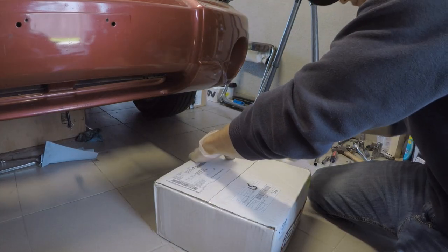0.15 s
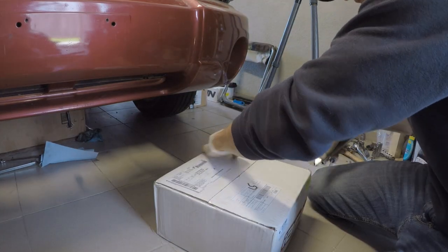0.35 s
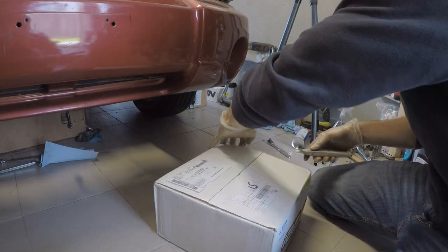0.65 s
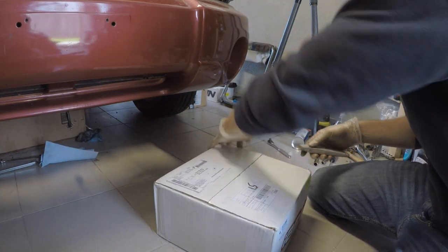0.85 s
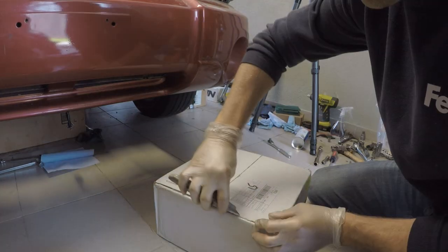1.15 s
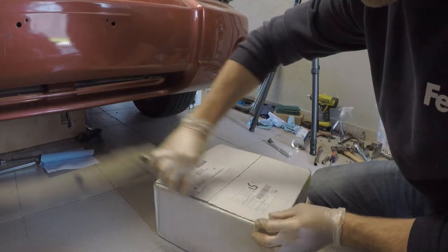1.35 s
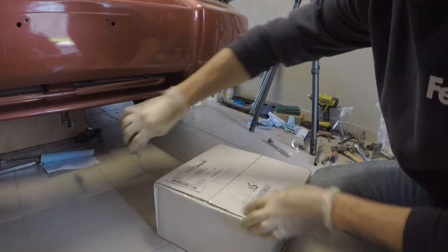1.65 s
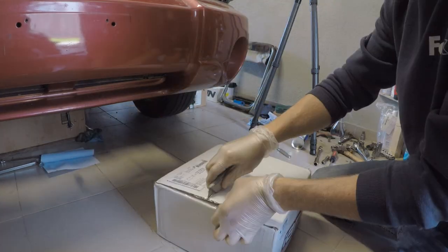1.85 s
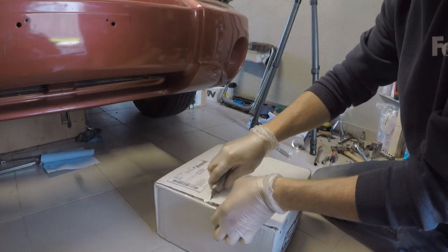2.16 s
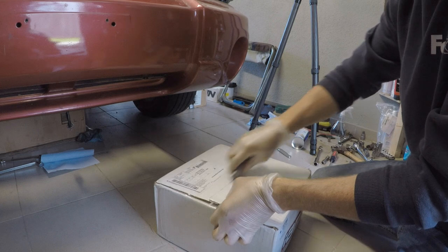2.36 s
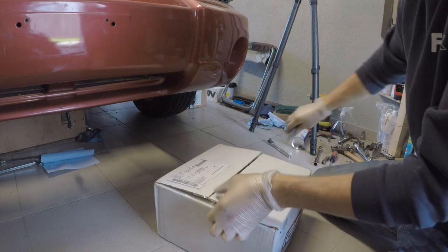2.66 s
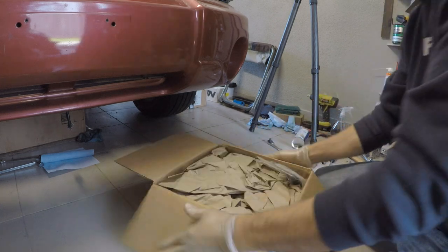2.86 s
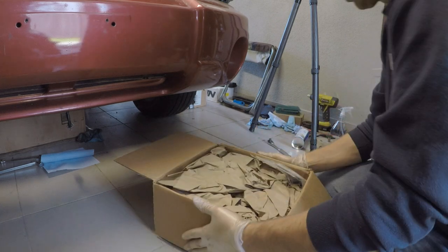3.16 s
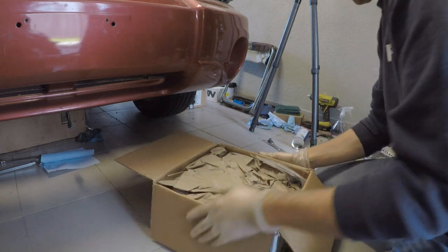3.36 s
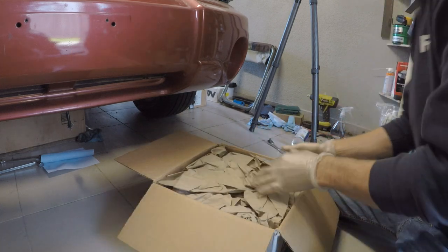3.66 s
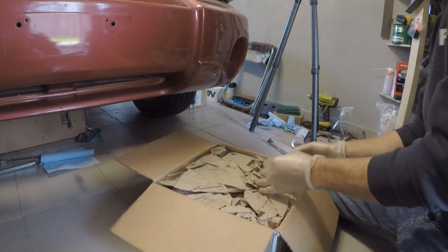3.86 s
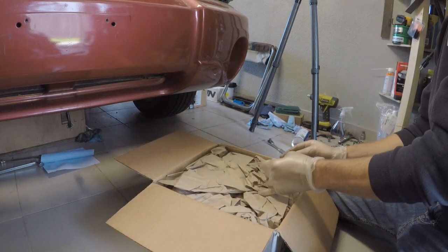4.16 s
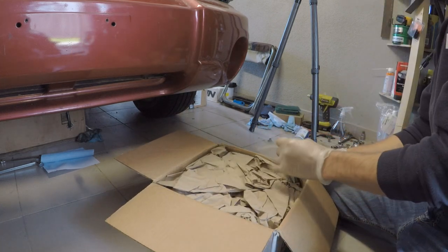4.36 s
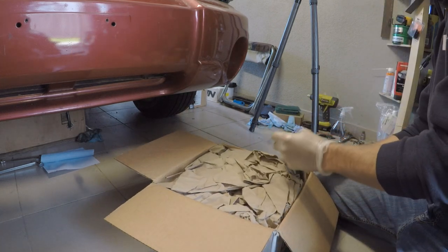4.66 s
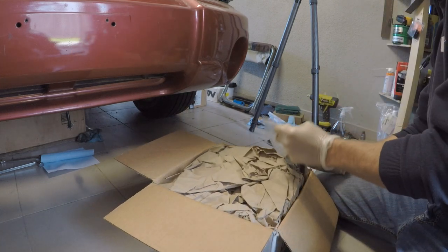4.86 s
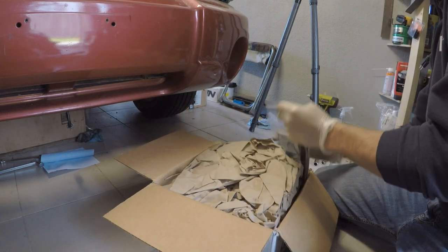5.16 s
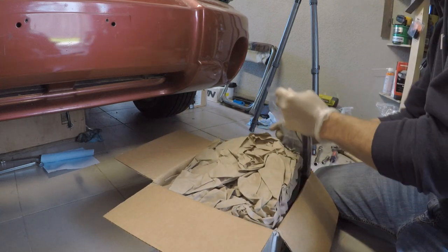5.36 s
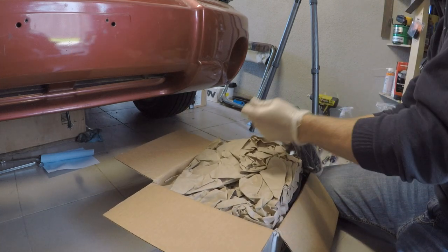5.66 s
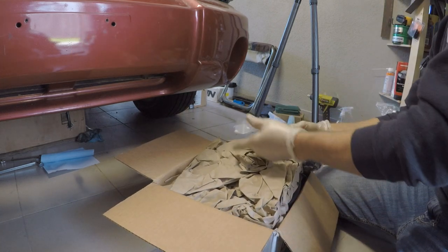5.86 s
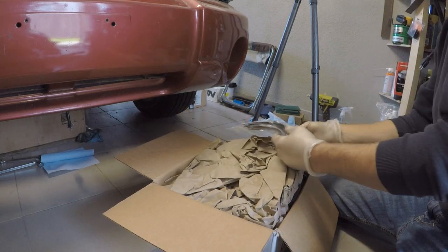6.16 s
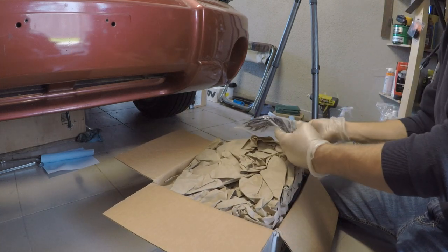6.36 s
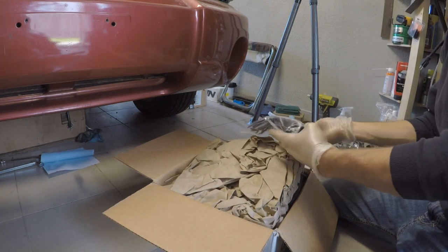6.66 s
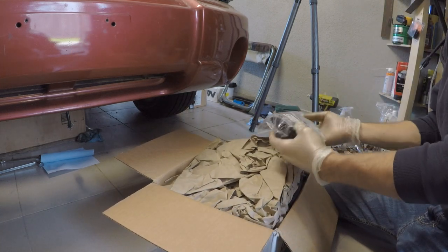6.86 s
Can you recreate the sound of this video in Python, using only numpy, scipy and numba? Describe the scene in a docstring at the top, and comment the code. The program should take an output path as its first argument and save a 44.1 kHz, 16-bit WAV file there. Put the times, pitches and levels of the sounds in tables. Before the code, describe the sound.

A cardboard box is slit open with a blade, then packing paper and a plastic bag are rustled by hand over low traffic rumble.

```python
"""A blade hisses and squeaks through a cardboard box, over traffic rumbling outside an open garage.
Gloved hands fold the flaps, drag the box over concrete and rummage in packing paper and a plastic bag.
Rubbed sheets scuff, creases buckle and snap; the hollow box booms when rubbed or knocked and groans
as a flap sticks and slips. An engine murmurs and drones for a while. Rustle and snaps echo briefly."""
import sys
import numpy as np
from scipy import signal
from scipy.fft import rfft, irfft, next_fast_len
from scipy.io import wavfile
from scipy.ndimage import uniform_filter1d
from numba import njit

SR = 44100
rng = np.random.default_rng(int(sys.argv[2]) if len(sys.argv) > 2 else 0)


def write(x):
    x = np.atleast_2d(x).T
    wavfile.write(sys.argv[1], SR, np.round(np.clip(x, -1, 1) * 32767).astype(np.int16))


N = 308788

# blade and hand strokes: t/s, length/s, start treble/dB, end treble/dB, middle re treble/dB, top boom/dB
HAND_STROKES = [(0.0, 0.14, -27.5, -31, 1.5, -24), (0.174, 0.082, -26.5, -26, 2, -28.5),
                (0.42, 0.68, -64, -60.5, 17, -45), (0.565, 0.11, -56, -43.5, 0, -58),
                (0.84, 0.047, -56, -50, 0, -58), (1.23, 0.1, -42, -28, 1.5, -32),
                (1.401, 0.1, -24.5, -33.5, 0, -18.5), (2.232, 0.071, -39, -46, 6, -23.5),
                (2.322, 0.11, -39.5, -33.5, 9, -27), (2.486, 0.087, -28, -24.5, 5.5, -15),
                (2.817, 0.048, -42, -34.5, 6.5, -38), (2.862, 0.079, -42, -36.5, -16, -40),
                (2.987, 0.086, -28, -44, 10.5, -18), (3.251, 0.087, -41, -38, 1, -40.5),
                (3.383, 0.22, -35, -44, -9, -43), (3.678, 0.033, -37.5, -32.5, 0, -32.5),
                (3.749, 0.12, -42, -45, 4, -37), (3.94, 0.078, -48, -59, 5, -38),
                (4.006, 0.025, -37.5, -47.5, 9.5, -37), (4.1, 0.047, -46, -39, 5.5, -33),
                (4.22, 0.056, -56, -57.5, 14, -44.5), (4.254, 0.045, -38, -42, 3, -41),
                (4.318, 0.089, -49, -56.5, 8, -46), (5.663, 0.2, -47.5, -42, 3.5, -68),
                (5.918, 0.19, -41, -38.5, 0.5, -54), (6.162, 0.22, -51, -52, 4.5, -69),
                (6.433, 0.083, -51.5, -51, 6.5, -62), (6.554, 0.038, -49, -36.5, 3, -33),
                (6.642, 0.11, -45.5, -58, 1, -51), (6.736, 0.024, -55, -63, 7, -45),
                (6.784, 0.048, -36, -37.5, 0.5, -65), (6.906, 0.04, -36, -49, 2, -57),
                (6.978, 0.012, -33, -33.5, -0.5, -33.5)]
# tugs at the paper: t/s, treble/dB, width/s, middle re treble/dB, boom/dB
PAPER_TUGS = [(4.495, -38, 0.087, 7.5, -26.5), (4.612, -41.5, 0.087, 7.5, -27),
              (4.736, -41.5, 0.097, 8, -30), (4.852, -41, 0.077, 9, -27), (4.978, -41, 0.12, 9.5, -28),
              (5.093, -35, 0.066, 9, -27), (5.15, -54.5, 0.13, 6, -29.5), (5.212, -34, 0.08, 6, -25),
              (5.309, -36, 0.059, 9, -29.5), (5.352, -42, 0.078, 1, -55), (5.438, -37, 0.1, 8.5, -46),
              (5.5, -41, 0.12, -3, -32), (5.604, -40.5, 0.069, 6, -42)]
# even hiss of blade and drag to crackle of sheets: t/s, crispness/0-1, film crinkle re treble/dB
TEXTURE = [(0, 0.05, -24), (2.7, 0.27, -32), (3.4, 0.03, -13), (4.3, 0.85, -8), (4.45, 0.4, -11),
           (5.55, 0.34, -6), (5.7, 0.56, -9.5), (7, 0.42, -11)]
CREASE_SPECTRUM = [(1180, -35), (2000, -11.5), (2610, -17.5), (2940, -9.5), (4510, -11.5), (4940, -11.5),
                   (6620, -4), (9730, -16), (11400, -29), (12500, -25.5), (14800, -50)]  # buckling paper: f/Hz, level/dB
FILM_SPECTRUM = [(500, -32), (1200, -3), (3500, -0.5), (6500, -1), (9500, -15), (14000, -18)]  # thin plastic: f/Hz, level/dB
SCUFF_SPECTRUM = [(250, 30.5), (450, 15), (900, 21), (1600, 12), (2500, 11.5), (4000, -33)]  # rubbed sheets: f/Hz, level/dB
# blade or flap edge catching: t/s, length/s, start f/Hz, end f/Hz, start level/dB, end level/dB
EDGE_SQUEAKS = [(.062, 0.031, 2020, 2000, -38, -37), (.155, 0.085, 1795, 1770, -39, -43),
                (.172, 0.021, 4560, 4600, -25.5, -34), (.182, .025, 3670, 3700, -45, -42),
                (.21, 0.044, 6400, 6700, -38, -35), (1.42, 0.04, 3000, 3010, -34, -42),
                (2.335, 0.06, 1424, 1487, -35, -34), (2.51, 0.026, 3640, 3450, -35, -38),
                (2.52, 0.046, 874, 935, -27, -32), (2.54, .035, 4070, 4400, -37, -32),
                (2.555, 0.041, 5930, 6100, -24, -36), (2.68, 0.014, 2900, 2800, -43, -60),
                (3.537, 0.023, 476, 418, -32.5, -29), (3.992, 0.0098, 3680, 3800, -36, -40),
                (1.303, .02, 5000, 5000, -31, -39), (1.4, .04, 6700, 6700, -49, -40),
                (.03, 0.033, 6870, 6950, -40, -33)]
HELD_BOOM = [(0.0, -50), (0.45, -23.5), (1.0, -24), (1.85, -28), (1.95, -31.5), (2.18, -38.5), (2.7, -29),
             (3.2, -31), (3.9, -40.5), (4.42, -34), (4.75, -36), (5.4, -33.5), (5.7, -39), (7.0, -52.5)]  # hum of the held box: t/s, level/dB

TRAFFIC_RUMBLE = [(0.0, -18), (0.16, -16.5), (0.45, -20), (1.02, -19), (1.08, -32), (1.27, -16),
                  (1.45, -31), (1.88, -25), (2.0, -34), (2.6, -31), (3.2, -26), (3.8, -20), (4.5, -24.5),
                  (5.0, -18.5), (5.2, -24.5), (7.0, -34.5)]  # deep rumble: t/s, level/dB
ROAR_AND_AIR = [(0.0, -33, -32), (0.4, -33, -51), (1.02, -28.5, -59), (1.06, -30.5, -51), (1.89, -39, -51),
                (1.91, -42.5, -55), (2.8, -40, -57.5), (7.0, -66, -58)]  # street noise: t/s, tyre level/dB, air level/dB
RUMBLE_SPECTRUM = [(12, -24), (22, 23.5), (45, 22.5), (100, 12), (200, -7), (400, -73)]  # traffic: f/Hz, level/dB
TYRE_SPECTRUM = [(100, 21), (200, 10), (400, -13), (900, -2), (1800, -19), (3500, -56)]  # tyres on the road: f/Hz, level/dB
AIR_SPECTRUM = [(500, -15), (1500, -0.5), (3500, -10), (6500, -2.5), (9000, -7), (14000, -30.5)]  # street air: f/Hz, level/dB
MURMUR_LEVEL = [(0.0, -14.5), (0.6, -20), (1.03, -19.5), (2.3, -35), (2.52, -18.5), (2.73, -29.5), (3.0, -69),
                (3.15, -35.5), (3.76, -21.5), (4.1, -29), (5.1, -23.5), (5.7, -34), (7.0, -34.5)]  # low murmur: idling engine, with the rubbed box's deep hum swelling around 2.5 s: t/s, level/dB

# single creases: t/s, level/dB, f/Hz, bright band gain/dB, shiver re crack/dB
CREASE_SNAPS = [(0.5192, -21, 3470, 6, -10), (0.5417, -22.5, 3780, 3, -3), (0.8415, -33, 3800, 8, -16),
                (0.877, -21, 3780, 15, -9), (1.0754, -18.5, 1950, 6, 4), (1.083, -12, 3650, 2, -11),
                (1.1683, -22, 3480, -2, -8), (1.271, -17.5, 3800, -4, 8), (1.287, -9, 3700, 4, -8),
                (1.306, -9, 1250, -17, 5), (1.5168, -15, 3940, -10, -9), (1.5332, -18.5, 1090, 11, -7),
                (1.6123, -24, 2420, 8, -6), (1.7628, -21.5, 3950, 1.5, 1), (2.1658, -25, 1030, 7, -1),
                (2.2061, -10.5, 1570, -1, -6), (2.68, -20, 2850, -28, -5), (2.9372, 0.5, 1800, -19, -26),
                (2.9376, -11, 2540, -6, -29), (2.9782, -11, 1500, -3, -10), (2.9825, -19, 1700, -5, -16),
                (3.7066, -8.5, 3350, -31, -11), (3.8045, -29, 3000, 0, -9), (3.94, -20, 1500, 9, -7),
                (3.9928, -20, 1200, 3, -7), (3.9956, -22, 3680, 0, -11), (4.093, -27, 1430, -15, -7),
                (4.139, -10, 1390, -1, -10), (4.2298, -28, 1360, -10, -9), (4.248, -17.5, 1480, -5, -9),
                (4.2594, -24, 1560, 0, -11), (4.2792, -17, 1060, 7, -7), (4.4634, -25, 1990, -7, -6),
                (4.689, -35, 3000, -3, -9), (4.837, -28, 2460, -4, -8), (4.955, -18.5, 2000, -11, -2),
                (5.0755, -25, 2520, -5, -8), (5.16, -29, 2500, -2, -9), (5.567, -15, 4520, 9, -17),
                (5.5957, -20, 2050, -6, -4), (5.7612, -19, 3030, 11, -16), (5.8288, -13.5, 6300, 9, -2.5),
                (5.841, -22, 1520, 4, -11), (5.9213, -24.5, 3670, -2, -7), (5.998, -33, 3660, -6, -17),
                (6.03, -24.5, 3400, -8, -6), (6.057, -27, 3200, -6, -12), (6.0727, -20, 2010, -17, -4),
                (6.1497, -19, 1810, -5, -2), (6.1496, -18, 3900, -2, -11), (6.2386, -26, 3820, 7, -11),
                (6.285, -27, 1410, 7, -11), (6.3028, -13, 2300, 7, -12.5), (6.3294, -31, 1240, -5, -11),
                (6.3834, -22.5, 1450, 5, -4), (6.4243, -23, 5570, 4, 0), (6.5324, -34, 1080, -5, -11),
                (6.54, -26, 3250, -11, -9), (6.5676, -25, 3200, -3, 5), (6.5864, -25, 1090, -6, -4),
                (6.6385, -26.5, 4260, -1, -9), (6.684, -25, 1440, -16, -2), (6.7117, -16, 1960, 6, -12),
                (6.779, -20, 2130, 4, -12), (6.7998, -17.5, 3090, 17, 3), (6.8244, -17, 1420, -1, -2),
                (6.8746, -21, 2000, 14, -1), (6.8963, -31, 3270, 0, -11), (6.9646, -15.5, 3810, 10, -5),
                (6.9904, -15, 1910, -7, -11)]
BOX_KNOCKS = [(0.622, -10, -33, 102), (1.309, -13, 1, 322), (1.444, -7.5, -10.5, 108),
              (2.927, -14, -30, 158), (2.9394, 2, -7, 200), (2.981, -3, -1, 132), (3.261, -20.5, -3, 191),
              (3.529, -23.5, -10, 242), (3.991, -29, -28, 130), (4.503, -14.5, -19, 222),
              (4.622, -8.5, -22, 188), (5.09, -14, -14, 197), (5.306, -20, -3, 597),
              (5.45, -7.5, -6.5, 121), (5.949, -24.5, -16, 110), (6.593, -38, 10.5, 102)]  # blows on the box: t/s, ring level/dB, slap re ring/dB, favoured f/Hz
BOX_MODES = [(126, 3.5, 0.14), (161, 7.5, 0.073), (215, -5, 0.1), (234, 8, 0.034), (318, 0.5, 0.15),
             (422.5, -5.5, 0.19), (674, 17, 0.0096), (1354, 0, 0.041), (1890, 10, 0.04), (2500, 4, 0.028)]  # wall modes: f/Hz, level/dB, t60/s
DRY_TICKS = [(1.033, -14.5), (2.803, -14)]  # ticks: t/s, level/dB
# held engine notes: t/s, length/s, start f/Hz, end f/Hz, start level/dB, end level/dB
ENGINE_NOTES = [(1.036, .85, 61.32, 60.24, -17, -19.5), (1.91, 0.41, 64.8, 61.5, -30, -30)]
ENGINE_HARMONICS = [(1, 5), (2, -11), (3, -22), (4, -51)]  # drone partials: multiple, gain/dB
# flap stick-slip: t/s, length/s, start f/Hz, end f/Hz, start level/dB, end level/dB
FLAP_GROANS = [(2.22, 0.068, 114, 115, -20, -10), (2.39, 0.1, 113.3, 154.6, -15.5, -13),
               (2.525, 0.053, 134.8, 140, -19, -10)]
GROAN_HARMONICS = [(1, 0.5), (2, -18), (3, -21)]  # groan partials: multiple, gain/dB

PORT_LIKENESS = [(60, 0.76), (130, 0.8), (290, 0.76), (630, 0.72), (1370, 0.76), (3000, 0.75), (6560, 0.4),
                 (14300, .4)]  # between the microphone ports: f/Hz, coherence/0-1
PORT_LEAD = [(20, 0), (340, 0), (780, 1.25), (1460, 1.15), (2100, .5), (3100, .1), (6000, .8), (9000, 4.0),
             (14000, 6.5)]  # left ahead of right: f/Hz, phase/rad
PORT_TILT = [(25, 8), (60, -2.2), (110, -1.5), (200, -2), (370, -3), (680, -4), (1260, 0.0), (2310, 1.5),
             (4250, -2.5), (7800, -2), (14300, 1)]  # left re right: f/Hz, level/dB

ATTACK_DB_PER_S, RELEASE_DB_PER_S = 395, 373
RASP_HZ, RASP_DB_PER_OCTAVE = 1560, 58
LOUDEST_CREASE_SPREADS, SQUEAK_STEADY_GAIN = 2.2, .35
REST_HZ, PRESSED_HZ = 102.6, 154.2
IDLE_HZ, WHINE_HZ, WHINE_DB = 65.95, 309, -54
CRACK_T60_S, SHIVER_T60_S = .009, 0.14
GARAGE_T60_S, GARAGE_DB = .5, -8.5
TOP_HZ, CEILING = 14950, .95


def undb(db):
    """Decibels to gain."""
    return 10 ** (np.asarray(db) / 20)


def curves(table):
    """Value columns of a timed table, interpolated per sample."""
    times_s, *columns = np.vstack(table).T
    return [np.interp(np.arange(N) / SR, times_s, column) for column in columns]


def per_bin(points):
    """(f/Hz, value) points at each FFT bin, on a log axis."""
    hz, value = np.transpose(points)
    return np.interp(np.log(np.fft.rfftfreq(next_fast_len(N), 1 / SR) + 1), np.log(hz + 1), value)


def unit(x):
    """Scale to rms 1."""
    return x / np.sqrt(np.mean(x ** 2))


def colour(x, spectrum):
    """Shape by (f/Hz, level/dB) points; rms 1."""
    size = next_fast_len(N)
    return unit(irfft(rfft(x, size) * undb(per_bin(spectrum)), size)[:, :N])


def noise():
    """White noise. Row 0: shared by both microphone ports; row 1: right port only."""
    return rng.standard_normal((2, N))


@njit
def bandpass(x, hz, width):
    """State-variable filter with a moving centre; width = 1/Q."""
    y = np.empty_like(x)
    for row in range(x.shape[0]):
        band, low = 0., 0.
        for i in range(x.shape[1]):
            g = np.tan(np.pi * hz[i] / SR)
            v = (band + g * (x[row, i] - low)) / (1 + g * (g + width))
            band, low = 2 * v - band, low + 2 * g * v
            y[row, i] = width * v
    return y


def fade(t60_s, length_s):
    """Exponential decay."""
    return np.exp(-np.log(1000) * np.arange(int(length_s * SR)) / SR / t60_s)


def add(out, at_s, sound):
    """Mix in a short sound."""
    i = int(at_s * SR)
    out[:, i:i + sound.shape[-1]] += sound[..., :N - i]


def wander(hz, octaves, hold_s):
    """A pitch that jumps about hz after each hold."""
    hold = int(hold_s * SR)
    steps = np.repeat(rng.uniform(-0.985, 1, N // hold + 1), hold)[:N]
    return hz * 2 ** (octaves * uniform_filter1d(steps, size=200))


def tone(notes, partials):
    """Notes gliding in pitch and level."""
    t, out = np.arange(N) / SR, 0
    for at_s, length_s, start_hz, end_hz, start_db, end_db in notes:
        span_s = [at_s, at_s + length_s]
        phase = 2 * np.pi * np.cumsum(np.interp(t, span_s, [start_hz, end_hz])) / SR
        gain = undb(np.interp(t, span_s, [start_db, end_db])) * (t > at_s) * (t < span_s[1])
        wave = sum(undb(db) * np.sin(multiple * phase) for multiple, db in partials)
        out = out + uniform_filter1d(gain, size=400) * np.sqrt(2) * wave
    return out


def crackle(rate_per_s, spread_db, t60_s):
    """Envelope of random decaying kicks, a few much louder; rms 1."""
    fires = rng.random(N) < rate_per_s / SR
    kick_db = spread_db * rng.exponential(size=N).clip(0, LOUDEST_CREASE_SPREADS)
    power = signal.fftconvolve(fires * undb(2 * kick_db), fade(t60_s, 0.24) ** 2)[:N]
    return unit(np.sqrt(power.clip(0) + 1e-12))


def handling():
    """Treble, middle and boom gains: strokes rise, ramp and die; tugs swell and pass."""
    t, gains = np.arange(N) / SR, np.full((3, N), 1e-6)
    for at_s, length_s, start_db, end_db, middle_db, boom_db in HAND_STROKES:
        db = np.interp(t, [at_s, at_s + length_s], [start_db, end_db])
        db -= ATTACK_DB_PER_S * (at_s - t).clip(0) + RELEASE_DB_PER_S * (t - at_s - length_s).clip(0)
        gains += undb(db) * undb([[0], [middle_db], [boom_db - max(start_db, end_db)]])
    for at_s, db, width_s, middle_db, boom_db in PAPER_TUGS:
        swell = np.exp(-(2 * (t - at_s) / width_s) ** 2)
        gains += swell * undb([[db], [db + middle_db], [boom_db]])
    return gains


def rustle(treble, middle):
    """Creases crackle and ring in the treble; rubbed sheets scuff and rasp in the middle."""
    crispness, crinkle_db = curves(TEXTURE)
    buckling = crackle(300., 8.8, 0.053) ** crispness.clip(0, 1.5)
    creases = colour(noise() * buckling, CREASE_SPECTRUM)
    crinkles = colour(noise() * crackle(130., 2.1, 0.014), FILM_SPECTRUM)
    facets = sum(unit(bandpass(noise() * buckling, wander(hz, octaves=0.47, hold_s=.035), 0.023))
                 for hz in (2100., 3800., 6000.))
    scuffs = colour(noise() * buckling, SCUFF_SPECTRUM)
    # thinner middle, higher rasp
    rasp_hz = (RASP_HZ * 2 ** (20 * np.log10(treble / middle) / RASP_DB_PER_OCTAVE)).clip(500, 5000)
    friction = noise() * buckling * crackle(130., 2.3, 0.065)
    rasp = unit(bandpass(bandpass(friction, rasp_hz, 0.073), rasp_hz, 0.89))
    return (treble * (creases + undb(crinkle_db) * crinkles + undb(-15) * facets)
            + middle * (scuffs + undb(-16) * rasp))


def box_boom(pressed):
    """Rubbed walls boom, higher as a hand stiffens them; small side panels sound above."""
    held = undb(curves(HELD_BOOM)[0])
    wall_hz = REST_HZ + (PRESSED_HZ - REST_HZ) * pressed / (pressed + held)
    rubbing = crackle(60., 0.81, 0.22)
    walls = unit(bandpass(bandpass(noise() * rubbing, wall_hz, 0.49), wall_hz, 0.99))
    panels = unit(bandpass(noise() * rubbing, np.full(N, 370.), 0.55))
    return (held + pressed) * (walls + undb(-34.5) * panels)


def street():
    """Traffic rumble, tyre roar and the hiss of the air."""
    roar_db, air_db = curves(ROAR_AND_AIR)
    rumble = undb(curves(TRAFFIC_RUMBLE)[0]) * colour(noise(), RUMBLE_SPECTRUM)
    roar = undb(roar_db) * colour(noise(), TYRE_SPECTRUM)
    return rumble + roar + undb(air_db) * colour(noise(), AIR_SPECTRUM)


def low_murmur():
    """Murmur in two narrow noise bands, muted during the drone."""
    t, hz = np.arange(N) / SR, np.full(N, IDLE_HZ)
    murmur = unit(bandpass(noise(), hz, 0.032) + 0.4 * bandpass(noise(), 1.168 * hz, 0.046))
    idling = (t < ENGINE_NOTES[0][0]) | (t > ENGINE_NOTES[-1][0] + ENGINE_NOTES[-1][1])
    return undb(curves(MURMUR_LEVEL)[0]) * murmur * idling


def edge_squeaks():
    """Blade or flap edge catches: a scratchy, fluttering tone 2 % below the listed pitch."""
    flutter = unit(uniform_filter1d(noise(), size=110))
    return tone(EDGE_SQUEAKS, [(0.98, 0)]) * (SQUEAK_STEADY_GAIN + flutter) * [[1], [.4]]


def crease_snaps():
    """A crack, then a shiver, ringing at the crease's pitch, in a broad band and in the bright top."""
    out = np.zeros((2, N))
    for at_s, db, pitch_hz, bright_db, shiver_db in CREASE_SNAPS:
        envelope = fade(CRACK_T60_S, .2) + undb(shiver_db) * fade(SHIVER_T60_S, .2)
        burst = rng.standard_normal((2, len(envelope))) * envelope
        burst[0, :3] += 5.0  # hard onset
        bands = [(pitch_hz, .2, 1.9), (3200, 1.5, .5), (6400, .35, undb(bright_db))]
        snap = sum(gain * bandpass(burst, np.full(len(envelope), float(hz)), width)
                   for hz, width, gain in bands)
        add(out, at_s, undb(db) * snap / np.abs(snap).max())
    # thick paper and card radiate little top treble
    return signal.sosfilt(signal.butter(4, 9500., fs=SR, output="sos"), out)


def box_knocks():
    """A blow slaps and rings the wall modes; its place favours those near one pitch."""
    t, out = np.arange(int(.25 * SR)) / SR, np.zeros((2, N))
    for at_s, db, slap_db, favoured_hz in BOX_KNOCKS:
        detunes = 1 + 0.0383 * rng.standard_normal(len(BOX_MODES))
        ring = 0
        for (hz, mode_db, t60_s), detune in zip(BOX_MODES, detunes):
            gain = undb(mode_db - 10.9 * abs(np.log2(hz / favoured_hz)))
            ring += gain * fade(t60_s, .25) * np.sin(2 * np.pi * hz * detune * t)
        ring *= np.minimum(t / 0.0023, 1)
        slap = rng.standard_normal((2, len(t))) * (fade(0.003, .25) + 0.19 * fade(0.076, .25))
        for hz, width in (1300., 0.48), (1800., 3.9):
            slap = bandpass(slap, np.full(len(t), hz), width)
        knock = ring / np.abs(ring).max() + undb(slap_db) * slap / np.abs(slap).max()
        add(out, at_s, undb(db) * knock)
    return out


def ticks():
    """Sudden steps that decay."""
    out = np.zeros((2, N))
    for at_s, db in DRY_TICKS:
        add(out, at_s, undb(db) * fade(0.077, .05) * [[1], [0]])
    return out


def engine_drone():
    """The engine holds low, slightly sagging notes."""
    return tone(ENGINE_NOTES, ENGINE_HARMONICS)


def flap_groans():
    """A flap sticks and slips; the box groans in rising notes."""
    return tone(FLAP_GROANS, GROAN_HARMONICS)


def street_whine():
    """A faint sine fades in late."""
    t = np.arange(N) / SR
    fade_in = np.clip((t - 5.8) / 0.4, 0, 1)
    return fade_in * undb(WHINE_DB) * np.sqrt(2) * np.sin(2 * np.pi * WHINE_HZ * t)


def garage_echo(x):
    """Dense reflections as a decaying noise tail."""
    tail = rng.standard_normal((2, int(.6 * SR))) * fade(GARAGE_T60_S, .6)
    tail /= np.sqrt(np.sum(tail[0] ** 2))
    return undb(GARAGE_DB) * signal.fftconvolve(x, tail, axes=1)[:, :N]


def ports(pair):
    """Two microphone ports: partly alike, the left ahead and coloured a little differently."""
    size = next_fast_len(N)
    shared, own = rfft(pair, size)
    likeness, tilt = per_bin(PORT_LIKENESS).clip(0, 1), undb(per_bin(PORT_TILT) / 2)
    right = (likeness * shared + np.sqrt(1 - likeness ** 2) * own) * np.exp(-1j * per_bin(PORT_LEAD))
    return irfft(np.array([shared * tilt, right / tilt]), size)[:, :N]


def scene():
    """Paper with the garage's echo, box and street, in stereo."""
    treble, middle, boom = handling()
    paper = rustle(treble, middle) + edge_squeaks()
    clicks = crease_snaps() + ticks()
    echo = garage_echo(clicks + 0.67 * paper)
    box = box_boom(boom) + box_knocks()
    tones = (engine_drone() + flap_groans() + street_whine()) * [[1], [.3]]
    return ports(paper + clicks + echo + box + tones + street() + low_murmur())


def record(dry):
    """The microphone rounds peaks and cuts the top."""
    lowpass = signal.ellip(10, .2, 80, TOP_HZ, fs=SR, output="sos")
    return signal.sosfilt(lowpass, CEILING * np.tanh(dry / CEILING))


dry = scene()
out = record(dry)
write(out)
```